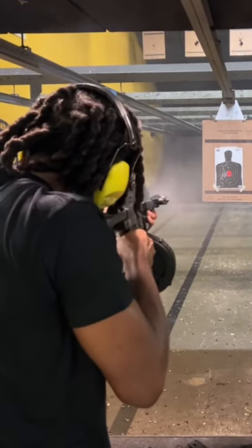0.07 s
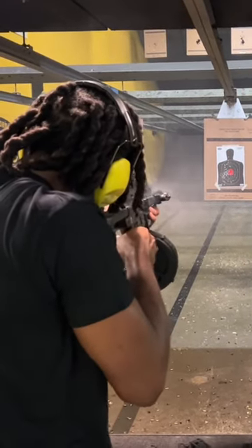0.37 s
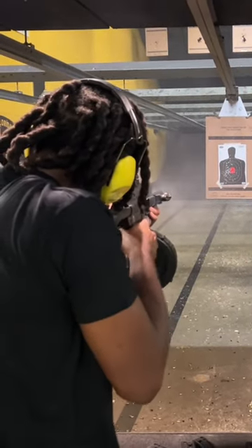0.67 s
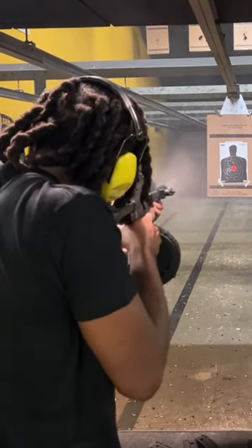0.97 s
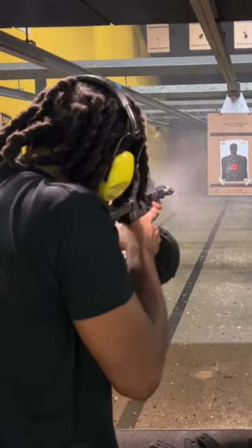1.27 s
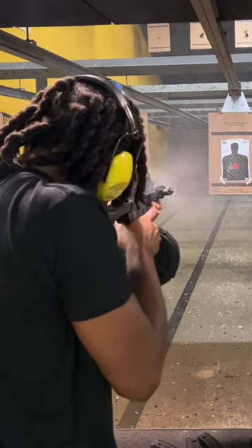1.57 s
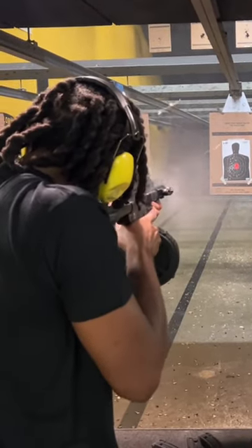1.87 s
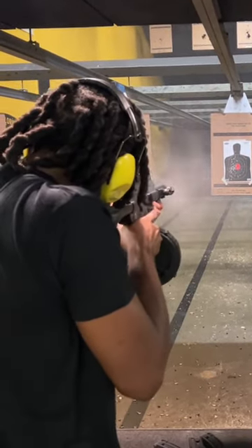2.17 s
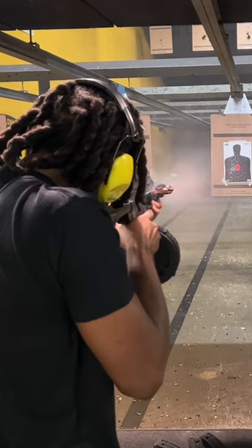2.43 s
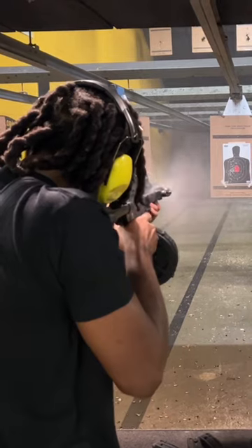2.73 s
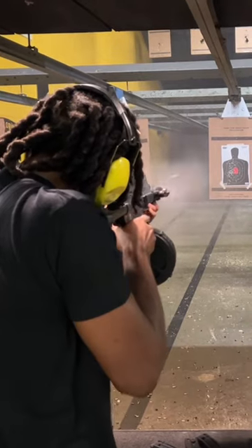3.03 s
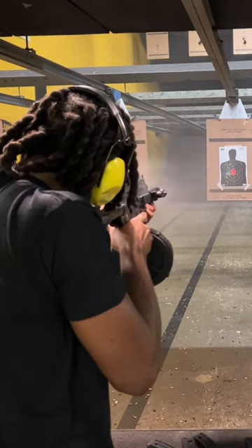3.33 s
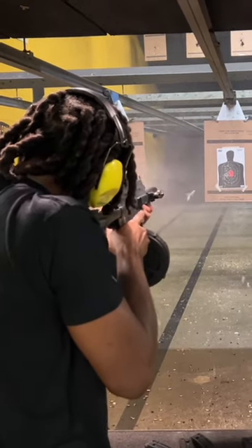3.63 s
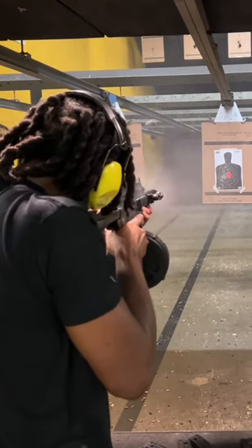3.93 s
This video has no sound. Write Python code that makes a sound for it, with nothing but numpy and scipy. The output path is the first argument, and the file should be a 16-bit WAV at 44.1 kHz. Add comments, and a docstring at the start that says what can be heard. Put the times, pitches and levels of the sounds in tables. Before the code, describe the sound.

A semi-automatic rifle fires fast and close in a ringing indoor shooting range.

```python
"""Concrete indoor range: a semi-automatic rifle fires about six shots a second just ahead of the mic.
Each shot is a muzzle crack and a low thump, a wash off the lane walls, and the bolt slamming home
some 30 ms later. A heavier gun in a nearby lane fires twice and booms back from the far end.
Farther lanes pop; the hall rings on over faint ventilation."""
import sys
import numpy as np
from scipy.fft import rfft, irfft, next_fast_len
from scipy.io import wavfile

SR = 44100
rng = np.random.default_rng(int(sys.argv[2]) if len(sys.argv) > 2 else 0)


def inscribe(sig):
    """Save sig as 16-bit PCM at rate SR to the path in sys.argv[1].

    A 1-D sig is mono; a 2-D sig holds one channel per row.
    Samples are clipped to [-1, 1] before scaling.
    """
    pcm = np.round(np.clip(np.atleast_2d(sig).T, -1, 1) * 32767)
    wavfile.write(sys.argv[1], SR, pcm.astype(np.int16))


N = 176400
N_FFT = next_fast_len(N + 8192)
HZ = np.fft.rfftfreq(N_FFT, 1 / SR)

# rifle shots (time [s], crack [dB], wash [dB], bark [dB], thump [dB], bolt time [s], bolt [dB])
RIFLE_SHOTS = [(.200, -19.5, -28.5, -39, -28, .2315, -16.5), (.676, -20.5, -29.5, -43, -41, .7065, -17),
               (1.03, -17, -18.5, -36, -28.5, 1.0645, -19.5), (1.183, -19.5, -19.5, -28, -27, 1.215, -18.5),
               (1.333, -20.5, -19.5, -28.5, -24.5, 1.364, -18.5),
               (1.483, -19, -18.5, -23.5, -27.5, 1.515, -18), (1.639, -19, -19.5, -23.5, -30, 1.668, -19.5),
               (1.784, -19.5, -19.5, -32.5, -28.5, 1.817, -18),
               (1.940, -18.5, -20.5, -29, -30.5, 1.973, -19.5),
               (2.085, -20, -20, -28.5, -29.5, 2.118, -20.5), (2.238, -21, -20, -28.5, -34, 2.271, -17.5),
               (2.392, -19, -21.5, -27.5, -29.5, 2.423, -18), (2.546, -18, -19.5, -29, -31.5, 2.578, -18.5),
               (2.700, -20, -21.5, -34, -30, 2.7315, -17.5), (2.869, -17.5, -24.5, -34, -37, 2.904, -19),
               (2.991, -23, -31, -36, -26, 3.022, -19.5), (3.154, -18.5, -19, -23, -32, 3.189, -18.5),
               (3.324, -16.5, -22, -30, -36, 3.355, -18), (3.488, -17.5, -21.5, -38, -36, 3.521, -19.5),
               (3.654, -16.5, -20.5, -29, -32.5, 3.686, -17), (3.853, -23, -29, -35, -29.5, 3.884, -16)]
# heavy gun shots (time [s], level [dB])
HEAVY_SHOTS = [(0.817, -14), (2.904, -14.5)]
# shots in farther lanes (time [s], crack [dB], wash [dB], thump [dB])
FAR_LANE_SHOTS = [(0, -24, -27.5, -21.5), (.119, -24.5, -22.5, -42), (.367, -18.5, -24.8, -38),
                  (3.822, -24, -23, -37)]
# spectra of muzzle crack, wall wash, low boom and pressure pulse (frequency [Hz], level [dB])
CRACK_SPECTRUM = [(40, -24), (150, -10), (330, 5), (600, 1.5), (1000, 4.5), (1400, 8), (1750, 3),
                  (2900, 6.5), (4200, 2.5), (6500, 2.5), (8500, -2.5), (12000, -3.5), (16000, -5.5)]
WASH_SPECTRUM = [(30, -22), (60, -5.5), (200, -4), (380, -3), (580, -8), (900, 0), (1550, 2.5), (2100, 4),
                 (2900, 4.5), (4300, -1.5), (6200, -1.5), (8000, -9.5), (12000, -14.5), (16000, -21)]
BOOM_SPECTRUM = [(30, -24), (70, -9), (130, -7), (230, -1), (400, 1), (580, -6), (900, 0.5), (1300, -2.5),
                 (2000, -9), (5000, -13), (16000, -35)]
THUMP_SPECTRUM = [(20, -38), (42, -10), (65, -2.5), (130, -4.5), (280, -0.5), (600, -9), (1500, -35),
                  (5000, -90)]


def amp(db):
    """Decibels to gain."""
    return 10 ** (np.asarray(db) / 20)


def unit(x):
    """Scale to rms 1."""
    return x / np.sqrt(np.mean(x ** 2) + 1e-20)


def curve(points):
    """Interpolate (frequency [Hz], value) points over log frequency."""
    hz, values = np.transpose(points)
    return np.interp(np.log(HZ + 1), np.log(hz + 1), values)


def room_peaks(depth_db, width_hz):
    """Random peaks and dips of a hard-walled room, dB over frequency."""
    return depth_db * np.interp(HZ / width_hz, np.arange(1200), rng.standard_normal(1200))


def resonance(centre_hz, db, width):
    """One peak, dB over frequency; width is a fraction of the centre."""
    return db * np.exp(-(np.log(HZ / centre_hz + 1e-9) / width) ** 2)


def noise(spectrum, peaks_db=0):
    """Coloured stereo noise, rms 1: a diffuse field at the two mic ports."""
    # likeness of left and right (frequency [Hz], correlation [-1..1])
    port_correlation = [(50, 0.34), (400, 0.63), (650, 0.25), (1250, 0.35), (1600, -0.32), (2400, 0.3),
                        (5000, -0.044), (8500, 0.31)]
    swing_from_hz, in_phase_hz, period_hz = 9200, 12020, 3530  # top treble swings in and out of phase
    swing = np.tanh(3.8 * np.cos(2 * np.pi * (HZ - in_phase_hz) / period_hz))
    correlation = np.where(HZ > swing_from_hz, swing, curve(port_correlation))
    angle = np.arccos(np.clip(correlation, -1, 1)) / 2
    coloured = rfft(rng.standard_normal((2, N_FFT))) * amp(curve(spectrum) + peaks_db)
    mid, side = coloured * [np.cos(angle), np.sin(angle)]
    return unit(irfft(np.array([mid + side, mid - side]), N_FFT)[:, :N])


def clumps(depth_db, rate_hz):
    """Fast random stereo gain, rms 1: reflections arrive in clumps."""
    knots = rng.standard_normal((2, N // 8))
    position = np.arange(N) * rate_hz / SR
    flutter = np.array([np.interp(position, np.arange(len(k)), k) for k in knots])
    return unit(amp(depth_db * flutter))


def envelope(times_s, levels_db, attack_s, hold_s, t60_s):
    """Rise, hold and decay per event; overlaps sum in power."""
    t = np.arange(int(min(attack_s + hold_s + t60_s, 2) * SR)) / SR
    decay_db = -60 * np.maximum(t - attack_s - hold_s, 0) / t60_s
    shape = np.minimum(t / attack_s, 1) * amp(decay_db) ** 2
    power = np.zeros(N + 3 * SR)
    for start_s, db in zip(times_s, levels_db):
        power[max(round(start_s * SR), 0):][:len(t)] += amp(db) ** 2 * shape
    return np.sqrt(power[:N])


def thumps(times_s, levels_db, lag_cycles):
    """Low pressure pulses; all frequencies lag by equal cycles, so the deepest comes last."""
    pulses = np.zeros(N)
    pulses[np.clip(np.round(times_s * SR).astype(int), 0, N - 1)] = amp(levels_db)
    response = amp(curve(THUMP_SPECTRUM)) * np.exp(-2j * np.pi * lag_cycles * np.log(HZ + 1))
    peak = np.abs(irfft(response, N_FFT)).max()
    return irfft(rfft(pulses, N_FFT) * response, N_FFT)[:N] / peak


def ventilation():
    """Faint steady rush of air."""
    return amp(-59.5) * noise(BOOM_SPECTRUM)


def hall():
    """Long ring fed by every shot, decaying per band; already ringing at the start."""
    # reverberation spectrum (frequency [Hz], level [dB])
    ring_spectrum = [(25, -33), (55, -9), (110, -14), (200, -7), (380, -7), (600, -9), (900, -.7),
                     (1300, -0.5), (2000, 2.5), (3100, 2.5), (4200, -0.5), (6200, -0.3), (8000, -8),
                     (12000, -21.5), (16000, -38)]
    # decay per band (frequency [Hz], T60 [s])
    band_decays = [(60, 1.5), (300, 2.6), (1000, 1.57), (2700, 1.84), (6000, 1.04), (15000, 1.8)]
    rifle_s, _, wash_db, *_ = np.transpose(RIFLE_SHOTS)
    heavy_s, heavy_db = np.transpose(HEAVY_SHOTS)
    far_s, _, far_db, _ = np.transpose(FAR_LANE_SHOTS)
    feed_db = np.maximum(wash_db, -25)  # even a shot with little wash rings the hall
    times_s = np.r_[rifle_s + .02, heavy_s, far_s]
    levels_db = np.r_[feed_db - 8.6, heavy_db - 14, far_db - 7]
    spectrum = rfft(noise(ring_spectrum, room_peaks(depth_db=2.1, width_hz=50)), N_FFT)
    ring = 0
    for band_hz, t60_s in band_decays:
        band_gain = curve([(hz, hz == band_hz) for hz, _ in band_decays])
        band = irfft(spectrum * band_gain, N_FFT)[:, :N]
        initial = envelope([0], [-33], attack_s=.00078, hold_s=.01, t60_s=t60_s)
        fed = envelope(times_s, levels_db, attack_s=.041, hold_s=.0079, t60_s=t60_s)
        ring += band * np.hypot(initial, fed)
    return ring * clumps(depth_db=1.2, rate_hz=310)


def far_guns():
    """Farther lanes: dull crack and thump, mostly a roar of wall reflections."""
    shot_s, crack_db, wash_db, thump_db = np.transpose(FAR_LANE_SHOTS)
    crack = envelope(shot_s - .001, crack_db, attack_s=.0026, hold_s=.0021, t60_s=.06)
    wash = envelope(shot_s, wash_db, attack_s=.0071, hold_s=.013, t60_s=.27)
    report = noise(WASH_SPECTRUM, resonance(centre_hz=2500, db=1, width=.43)) * np.hypot(crack, wash)
    return report * clumps(depth_db=2, rate_hz=600) + thumps(shot_s, thump_db, lag_cycles=.8)


def far_end_booms():
    """Pitched echoes of the heavy gun off the far end."""
    # echoes (time [s], level [dB], pitch [Hz])
    echoes = [(.068, -31, 288), (.988, -20, 392), (2.992, -27.5, 245), (3.077, -21.5, 302),
              (3.15, -24, 280), (3.282, -29, 230)]
    booms = 0
    for time_s, db, pitch_hz in echoes:
        boom = noise(BOOM_SPECTRUM, resonance(pitch_hz, db=8, width=.2))
        booms += boom * envelope([time_s], [db], attack_s=.0062, hold_s=.01, t60_s=.19)
    return booms


def heavy_gun():
    """Dense blast from the left with a deep push and longer sizzle; leaves the range rumbling."""
    # spectra of the blast and its bright tail (frequency [Hz], level [dB])
    blast_spectrum = [(30, -26), (90, -5), (185, 1.5), (350, -2), (520, 0), (780, 1.5), (1300, -1.5),
                      (2000, -7.5), (5000, -13), (16000, -33)]
    sizzle_spectrum = [(100, -20), (900, -4), (2000, -1.5), (3200, 1.5), (4000, -2.5), (5800, 1.5),
                       (8000, -9), (12000, -13.5), (16000, -19)]
    shot_s, db = np.transpose(HEAVY_SHOTS)
    crack = noise(CRACK_SPECTRUM) * envelope(shot_s, db - 2, attack_s=.001, hold_s=.002, t60_s=.022)
    blast = noise(blast_spectrum, room_peaks(depth_db=1.5, width_hz=95))
    blast *= envelope(shot_s + .001, db - .2, attack_s=.0035, hold_s=.014, t60_s=.27)
    sizzle = noise(sizzle_spectrum) * envelope(shot_s, db - 3.5, attack_s=.00087, hold_s=.035, t60_s=.49)
    push = noise(THUMP_SPECTRUM)
    push *= envelope(shot_s + .02, db - 15.5, attack_s=.011, hold_s=.018, t60_s=.67)
    push += thumps(shot_s + .00421, db - 2.5, lag_cycles=2.8)
    rumble = noise(BOOM_SPECTRUM, resonance(centre_hz=270, db=3.5, width=.35))
    rumble *= envelope(shot_s + .084, db - 15.5, attack_s=.054, hold_s=.15, t60_s=.91)
    report = (crack + blast + sizzle) * amp([[1.2], [-1.2]])
    return push + rumble + far_end_booms() + report * clumps(depth_db=2, rate_hz=700)


def wall_wash(shot_s, wash_db, bark_db):
    """Midrange bark and wash off the lane walls, sharing one random colour."""
    # bark spectrum (frequency [Hz], level [dB])
    bark_spectrum = [(100, -33), (500, -12), (950, -0.5), (1550, 1), (2500, -6.5), (6000, -26),
                     (16000, -50)]
    colour_db = room_peaks(depth_db=1.8, width_hz=228.6)
    bark = envelope(shot_s + .0052, bark_db - .9, attack_s=.0081, hold_s=.02, t60_s=.081)
    wash = envelope(shot_s + .0065, wash_db - .9, attack_s=.012, hold_s=.0097, t60_s=.24)
    return noise(bark_spectrum, colour_db) * bark + noise(WASH_SPECTRUM, colour_db) * wash


def bolt(close_s, db):
    """Bolt slamming home, with a bright slap off the booth."""
    # spectra of the impact and its reflection (frequency [Hz], level [dB])
    impact_spectrum = [(40, -22), (150, -7), (400, 0), (700, -3), (1200, -0.5), (2500, 4), (6000, 4.5),
                       (8500, -3), (12000, -10), (16000, -9)]
    slap_spectrum = [(100, -30), (1200, -17), (3000, -3.5), (6000, 3), (8500, -9.5), (16000, -22)]
    impact = noise(impact_spectrum, room_peaks(depth_db=1.5, width_hz=216))
    impact *= envelope(close_s, db, attack_s=.0011, hold_s=.0016, t60_s=.053)
    slap = envelope(close_s + .019, db - 8, attack_s=.002, hold_s=.002, t60_s=.037)
    tail = envelope(close_s + .01, db - 12, attack_s=.003, hold_s=.006, t60_s=.23)
    return impact + noise(slap_spectrum) * np.hypot(slap, tail)


def rifle():
    """Muzzle crack, wall wash, bolt closing; muzzle and bolt each thump."""
    shot_s, crack_db, wash_db, bark_db, thump_db, bolt_s, bolt_db = np.transpose(RIFLE_SHOTS)
    snap = envelope(shot_s - .0005, crack_db, attack_s=.0021, hold_s=.001, t60_s=.016)
    tail = envelope(shot_s, crack_db - 3.3, attack_s=.0032, hold_s=.0031, t60_s=.062)
    crack = noise(CRACK_SPECTRUM) * np.hypot(snap, tail)
    # successive shots cycle through four wall colours
    wash = sum(wall_wash(shot_s[k::4], wash_db[k::4], bark_db[k::4]) for k in range(4))
    report = crack + wash + bolt(bolt_s, bolt_db)
    muzzle_thump = thumps(shot_s, thump_db, lag_cycles=1.5)
    bolt_thump = thumps(bolt_s + .001, thump_db + 1.5, lag_cycles=1.051)
    return report * clumps(depth_db=2.5, rate_hz=800) + muzzle_thump + bolt_thump


def scene():
    """Guns, hall and ventilation in stereo."""
    return rifle() + heavy_gun() + far_guns() + hall() + ventilation()


def record(dry):
    """Mic: rounds off peaks, brighter on the left, steep band limit."""
    # channel balance (frequency [Hz], left minus right [dB])
    balance = [(200, -0.2), (1200, 0), (2100, -1), (3400, -0.5), (5400, 4), (7000, 3.5), (9000, -1)]
    ceiling, cutoff_hz = .85, 15800
    limited = dry / (1 + np.abs(dry / ceiling) ** 4) ** (1 / 4)
    channel_gain = amp(curve(balance) * np.array([[.5], [-.5]]))
    return irfft(rfft(limited, N_FFT) * channel_gain * (HZ < cutoff_hz), N_FFT)[:, :N]


dry = scene()
out = record(dry)
inscribe(out)
```